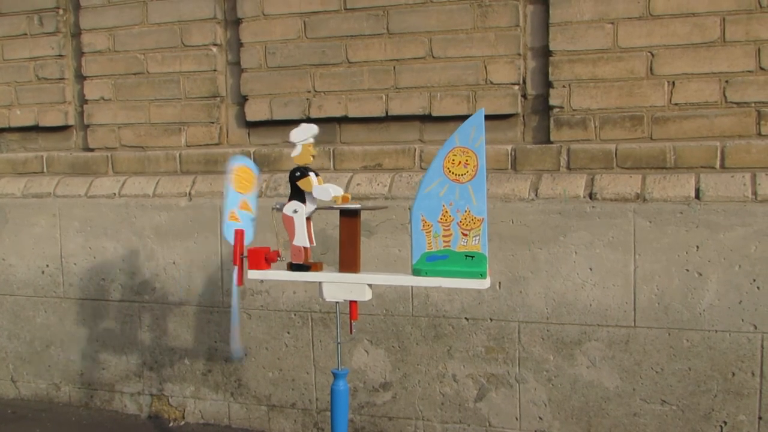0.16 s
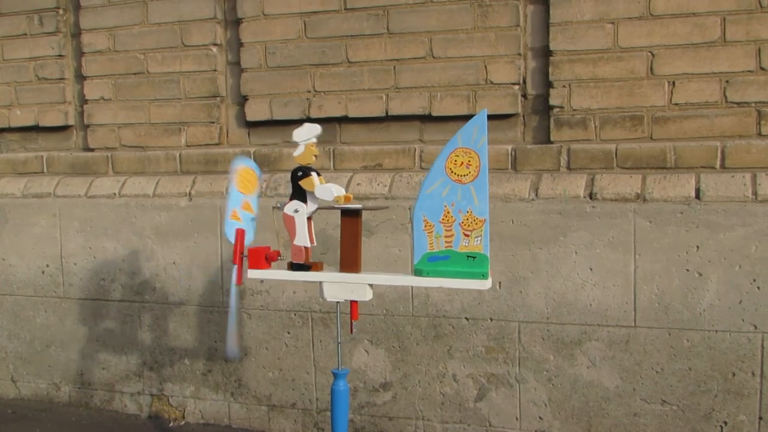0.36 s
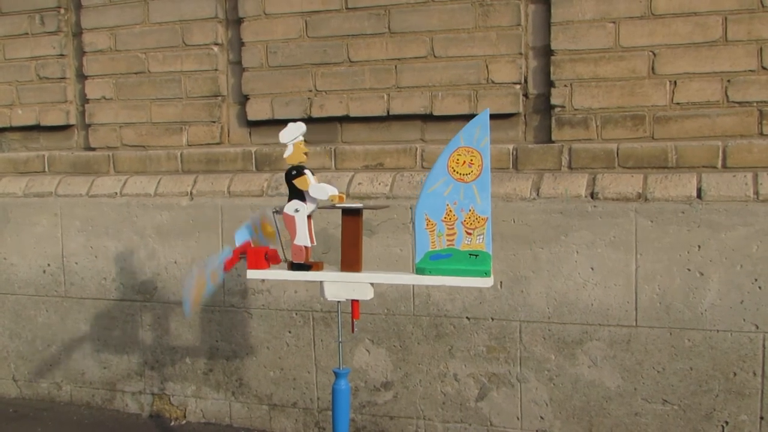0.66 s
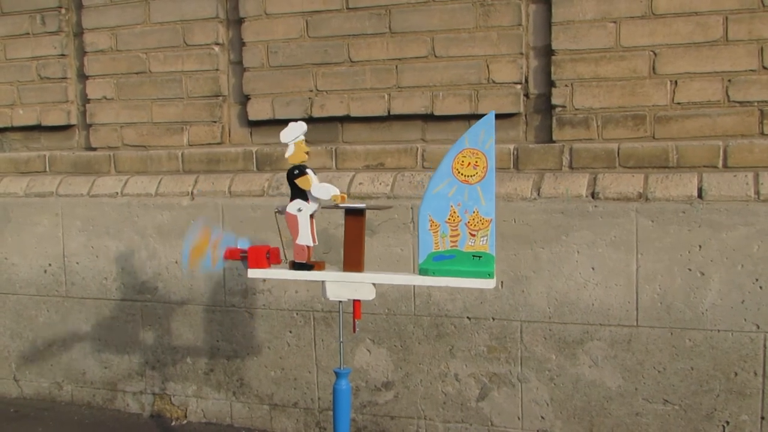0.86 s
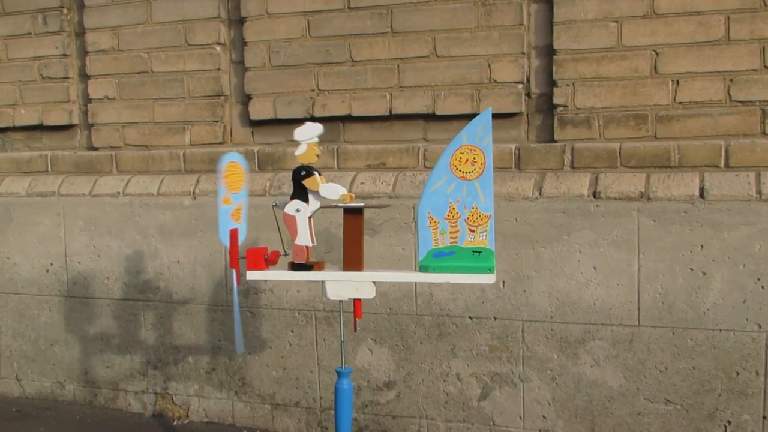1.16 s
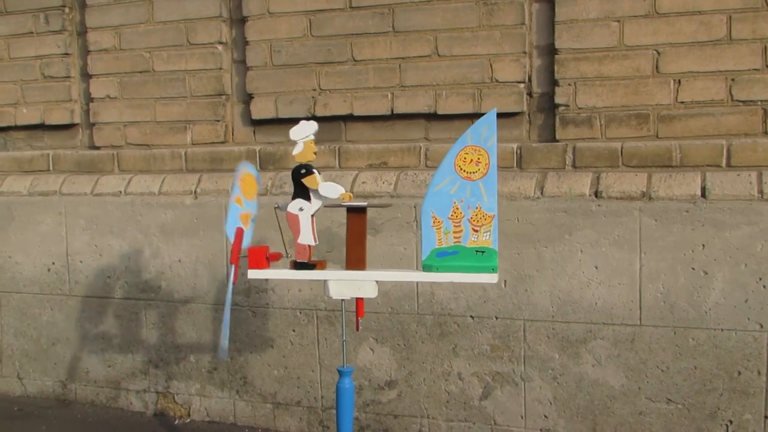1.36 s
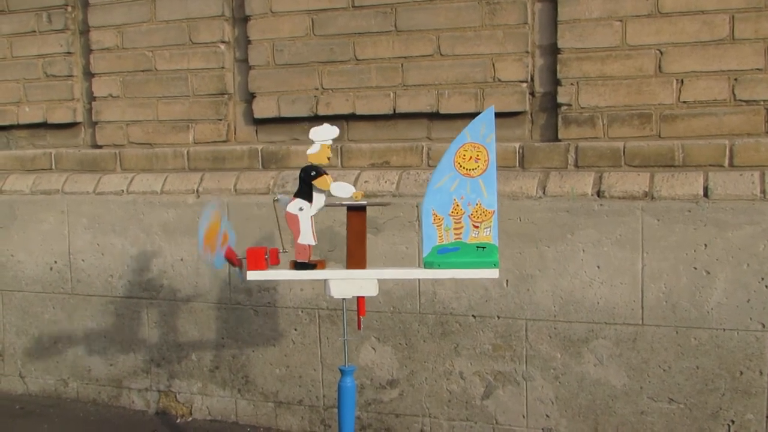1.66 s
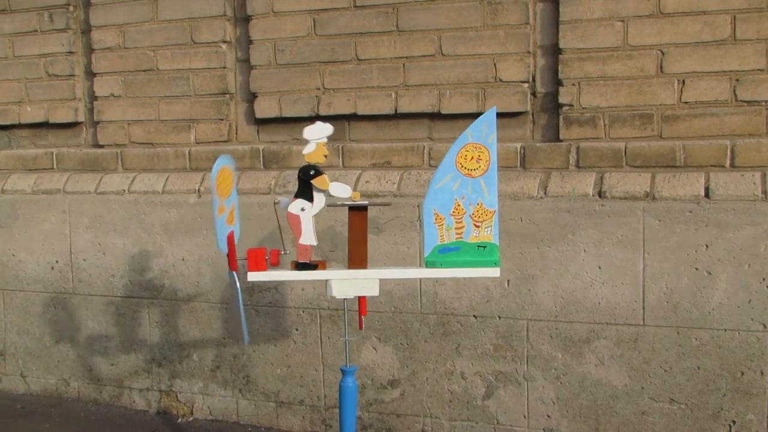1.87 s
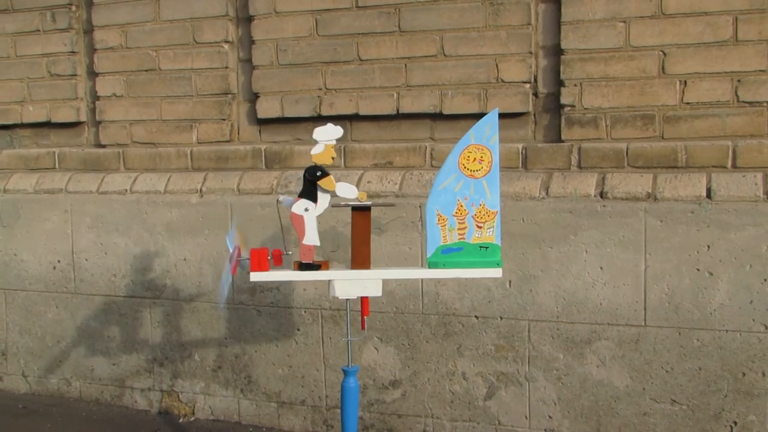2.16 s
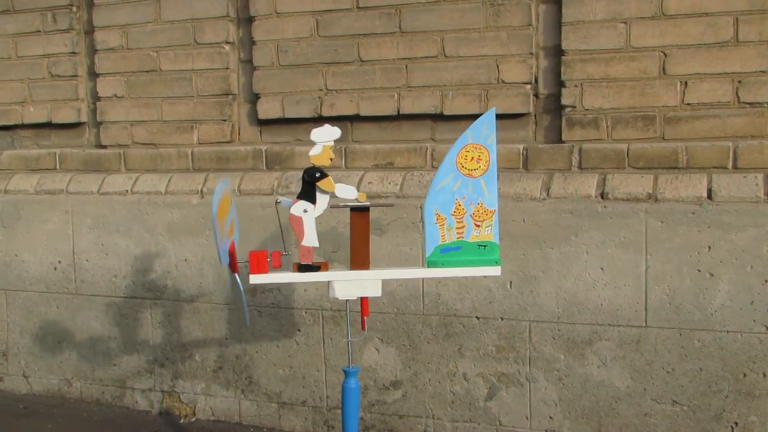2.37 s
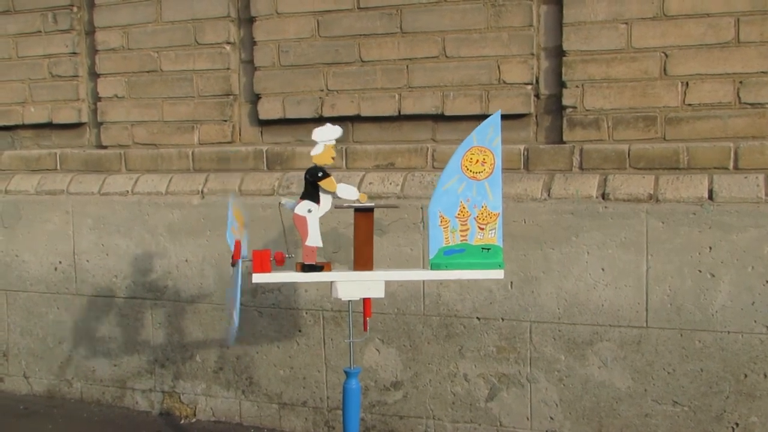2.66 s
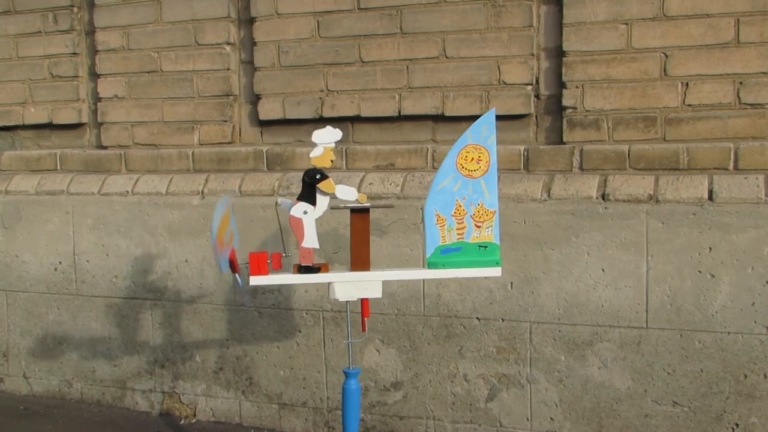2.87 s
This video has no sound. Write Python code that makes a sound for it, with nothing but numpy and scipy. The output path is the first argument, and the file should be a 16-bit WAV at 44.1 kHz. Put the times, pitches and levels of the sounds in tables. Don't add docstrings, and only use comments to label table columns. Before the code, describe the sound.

Heavy wind rumble and flutter on the microphone, nearly covering a toy windmill's faint regular wooden clicking.

```python
import sys
import numpy as np
from scipy import signal
from scipy.fft import rfft, irfft
from scipy.io import wavfile
from scipy.ndimage import uniform_filter1d

SR = 44100
rng = np.random.default_rng(int(sys.argv[2]) if len(sys.argv) > 2 else 0)


def makeup_ratio(level_db):
    decades = np.asarray(level_db, float) / 20
    return 10 ** decades


def wrap_up_sound(samples):
    columns = np.atleast_2d(samples).T
    tamed = np.clip(columns, -1, 1)
    steps = np.round(tamed * 32767).astype(np.int16)
    wavfile.write(sys.argv[1], SR, steps)


N = 133623
T = np.arange(N) / SR

# (frequency [Hz], level [dB per Hz])
STREET_HISS = [(400, -2.5), (1400, 0.5), (3000, -9.5), (3750, -13), (4050, -17), (7700, -21.5), (8100, -25),
               (13500, -27.5)]
# (time [s], speed as level [dB], push [dB])
WIND_COURSE = [(0, -39.5, -4), (.25, -38.5, 0.5), (0.647, -43.5, -4.5), (0.708, -59, 3.5),
               (0.838, -57.5, -0.5), (.99, -55, 1.5), (1.02, -43, 1), (1.199, -49.5, -0.5), (1.52, -52, 3),
               (1.69, -69, 3.5), (1.828, -60.5, 1.5), (1.878, -54.5, 1.5), (2.174, -52.5, 4),
               (2.243, -66.5, 2), (2.417, -48, 2), (2.61, -46.5, 1), (2.647, -61.5, 6), (2.77, -59, -2.5)]
# (time [s], peak [dB], length [s], extra push [dB])
WIND_PUFFS = [(.008, -18, 0.0094, 1.5), (0.176, -28.5, 0.023, -1), (0.32, -47, 0.0037, -2.5),
              (0.473, -66, 0.022, 4.5), (0.548, -36.5, 0.054, 0.5), (0.778, -41.5, 0.0083, -1.5),
              (0.915, -41, 0.024, 3), (1.002, -46, 0.017, 3.5), (1.036, -28.5, 0.013, 0),
              (1.101, -40.5, 0.022, -3), (1.158, -40.5, 0.016, -3), (1.285, -47.5, 0.0062, 6.5),
              (1.318, -45.5, 0.075, 0), (1.45, -40.5, 0.042, -3.5), (1.582, -56.5, 0.082, 0),
              (1.727, -63, 0.047, 6.5), (1.908, -52, 0.018, 4.5), (1.96, -47.5, 0.03, 3.5),
              (2.069, -53.5, 0.011, 5.5), (2.108, -40, 0.032, -1.5), (2.132, -46, 0.023, 2.5),
              (2.302, -45, 0.022, 0.5), (2.794, -37, 0.12, 3.5), (2.896, -45.5, 0.3, 3),
              (3.005, -39, 0.004, -0.5)]
# (frequency [Hz], level [dB per Hz])
EDDY_SPECTRUM = [(15, 4.5), (60, 0), (190, 0.5), (320, -4.5), (520, -12), (1000, -35.5), (2000, -64),
                 (5000, -78)]
# (frequency [Hz], level [dB])
ONE_PORT_SHARE = [(30, -19.5), (100, -12), (250, -12.5), (1000, -12), (3000, -14)]
# (frequency [Hz], level [dB])
LEFT_LEAN = [(60, -0.76), (250, 1.52), (1000, 2), (3000, 4)]
# (time [s], level
# [dB], pitch [Hz], length [cycles], right share [gain])
EDDY_STRIKES = [(.0005, -13.5, 112, 1.1, 1.56), (2.96, -12, 414, 3.7, 0.35), (1.037, -6, 450, 0.97, 0.54),
                (.180, -32, 2120, 2.5, 0.42), (.487, -4.5, 90, 1.8, 0.77), (.572, -6, 90, 1.6, 0.79),
                (.776, -33.5, 890, 1.5, 0.68), (.920, -6.5, 710, 1.9, 0.46), (.938, -20, 910, 1.7, 0.46),
                (1.012, -6, 451, 2.7, 0.59), (1.039, -30, 2430, 0.98, 0.18), (1.064, -27, 1300, 2, 0.41),
                (1.095, -32, 1630, 3, 0.56), (1.289, -27.5, 1440, 3.3, 0.29), (1.912, -19, 65, 1.4, 1.2),
                (2.110, -15.5, 850, 1.8, 0.41), (2.138, -14, 720, 1.9, 0.35), (2.82, -1.5, 78, 1, 0.75),
                (2.848, -3, 214, 1.17, 0.4), (2.92, -8.5, 71.5, 1.4, 0.85)]
# (time [s], peak [dB], pitch [Hz])
EDDY_FLICKS = [(0.066, -23.5, 840), (0.129, -28, 767), (0.172, -28.5, 830), (0.273, -26, 810),
               (0.332, -35.5, 816), (0.344, -25, 821), (0.417, -27, 767), (0.502, -27.5, 899),
               (0.54, -31.5, 826), (1.026, -28.5, 980), (1.069, -38, 791), (1.16, -31, 764),
               (1.211, -31, 850), (1.243, -41, 767), (1.313, -38, 988), (1.33, -34, 751),
               (1.345, -29.5, 765), (1.369, -44, 751), (1.432, -44, 826), (1.473, -26.5, 760),
               (1.846, -41, 820), (1.96, -53, 751), (1.981, -40, 796), (2.307, -45, 820),
               (2.396, -37.5, 790), (2.436, -36, 751), (2.535, -45, 773), (2.8, -35, 775),
               (2.882, -34, 883), (2.901, -24, 829), (2.947, -39, 1180), (2.956, -31, 848),
               (3.014, -37, 867)]
# (time [s], peak [dB], length [s], lower ring [dB])
CRANK_CLACKS = [(0.1014, -53, 0.011, -13), (0.1784, -57, 0.008, -5), (0.3085, -58.5, 0.015, -7),
                (0.3989, -64, 0.0083, -14), (0.53, -62, 0.0083, -32), (0.626, -65, 0.0098, -6),
                (0.7436, -54, 0.013, -10.5), (0.8624, -60.5, 0.011, -4), (0.971, -52, 0.014, -9),
                (1.079, -65, 0.0092, -5), (1.1976, -50.5, 0.011, -15), (1.3103, -56.5, 0.011, -9),
                (1.428, -53.5, 0.0098, -13), (1.523, -66, 0.0096, -9), (1.656, -56, 0.011, -9),
                (1.79, -62.5, 0.0089, -13), (1.8926, -53.5, 0.012, -12.5), (2.0066, -51.5, 0.015, -14),
                (2.129, -57.5, 0.013, -7), (2.246, -63, 0.011, -10), (2.381, -56.5, 0.012, -6),
                (2.4966, -59.5, 0.0094, -1.5), (2.6184, -52.5, 0.017, -8.5), (2.731, -57.5, 0.0071, -13),
                (2.876, -62, 0.011, -6), (2.992, -54.5, 0.0073, -4.5)]
# (time [s], peak [dB], lower ring [dB])
LIGHT_CLACKS = [(0.1344, -65.5, -6), (0.1914, -62, -7), (0.342, -63, -17), (0.4154, -69, 5.5),
                (0.5258, -57, -4), (0.559, -58.5, -12), (0.776, -65, -9), (0.849, -60.5, -6),
                (1.0055, -68, -11), (1.07, -65, -5), (1.23, -59, -8), (1.2599, -68, -7),
                (1.3163, -60, -11), (1.3338, -64, -6), (1.4234, -55, -8), (1.5324, -63, -15),
                (1.544, -70, -7), (1.654, -57, -9), (1.686, -66, -11), (1.718, -60.5, -9),
                (1.7633, -68, -6), (1.7748, -59, -13), (1.9568, -61.5, -8), (2.0305, -57, -12),
                (2.167, -66.5, 1), (2.198, -63, -14), (2.2574, -61.5, -7), (2.364, -62, -6),
                (2.4412, -71, 3), (2.4866, -61, -9), (2.5141, -60, -9), (2.612, -61, -14),
                (2.6544, -73, -5), (2.7234, -61, -13), (2.7544, -59.5, -10), (2.8608, -63, -8),
                (2.975, -59, -4)]
# (frequency [Hz], level [dB], t60 [s])
WOOD_AND_WIRE = [(4390, 2, 0.0067), (4760, -4, 0.012), (7100, -33, 0.0021), (7560, -8, 0.005),
                 (8880, -4.5, 0.0084), (10000, -7, 0.0028), (11100, -6.5, 0.009), (12470, -2, 0.0033),
                 (13700, -7, .005)]
# (time [s], level [dB], pitch [Hz], length [s])
AXLE_SQUEAKS = [
    (0.186, -60, 3500, 0.025),
    (0.395, -55, 3460, 0.012),
]
# (frequency [Hz], width [Hz], depth [0-1])
NARROW_GAPS = [(3915, 260, 0.9), (8030, 230, 0.8)]


def unit_power(x):
    return x / np.sqrt(np.mean(x ** 2) + 1e-20)


def at_hz(points, hz):
    point_hz, level_db = np.transpose(points)
    return np.interp(np.log(hz), np.log(point_hz), level_db)


def drift(hz):
    r = np.exp(-40 * np.pi * hz / SR)
    slow = signal.lfilter([1], [1, -2 * r, r * r], rng.standard_normal(N // 20 + 2002))[2000:]
    return np.interp(np.arange(N) / 20, np.arange(len(slow)), unit_power(slow))


def band(x, low_hz, high_hz, order):
    return signal.sosfilt(signal.butter(order, [low_hz, high_hz], "band", fs=SR, output="sos"), x)


def settled(sos, x):
    lead_in = 2 * x[:, :1] - x[:, 999:0:-1]
    return signal.sosfilt(sos, np.concatenate([lead_in, x], axis=1))[:, 999:]


def swell(s, length_s):
    u = np.clip((T - s) / max(length_s, 1e-3) * 3, 0, 40)
    return u * np.exp(1 - u)


def street():
    level_db, early_db, top_hz, alike = -62.5, 3.5, 13700, 0.59
    hz = np.arange(N // 2 + 1) * SR / N + 1
    shape = makeup_ratio(at_hz(STREET_HISS, hz)) / (1 + (hz / top_hz) ** 20)
    mid, side = irfft(rfft(rng.standard_normal((2, N))) * shape, N)
    both = np.sqrt(1 + alike) * mid + np.sqrt(1 - alike) * side * [[1], [-1]]
    fade_db = early_db * np.exp(-(T / 0.56) ** 2)
    return makeup_ratio(level_db + fade_db + 0.55 * drift(24)) * unit_power(both)


def flicker(gust_db):
    lull_db, top_db = -21, 7.5
    flick_db = 5 * drift(83)
    flick_db = flick_db + 3 * (drift(149) ** 2 - 1)
    flick_db = flick_db - uniform_filter1d(flick_db, size=1000)
    flick_db = flick_db / (1 + makeup_ratio(lull_db - gust_db))
    return top_db * np.tanh(flick_db / top_db)


def wind():
    level_db, puff_db, top_speed_db = -17, -1.5, 19
    octaves_per_db, loud_follows, lump_db = 0.067, 0.079, 1.75
    right_cut_hz, low_cut_hz, port_cut_hz = 1615, 44, 14000

    s, speed_db, push_db = np.transpose(WIND_COURSE)
    power = makeup_ratio(2 * np.interp(T, s, speed_db))
    push = np.interp(T, s, push_db)
    for t, peak_db, length_s, extra_db in WIND_PUFFS:
        power = power + makeup_ratio(2 * (peak_db + puff_db)) * swell(t - .004, length_s) ** 2
        push = push + extra_db * swell(t - .004, 1.54 * length_s)
    gust_db = 10 * np.log10(power) + 48
    push = push + loud_follows * gust_db + lump_db * drift(25)

    rush_db = -10 * np.log10(makeup_ratio(-2 * (gust_db + flicker(gust_db))) + makeup_ratio(-2 * top_speed_db))
    smooth_db = uniform_filter1d(uniform_filter1d(rush_db, size=40), size=40)
    speed = 2 ** (octaves_per_db * smooth_db)

    run_in = 8192
    white = rng.standard_normal((2, 3, N + run_in))
    edges = 14 * 2 ** np.arange(0, 8.6, .5)
    both, own = 0, 0
    for k, (low, high) in enumerate(zip(edges, edges[1:])):
        hz = np.sqrt(low * high)
        noise = band(white[k % 2], low, high, order=3)[:, run_in:]
        lean_db = at_hz(LEFT_LEAN, hz) * np.array([[.5], [-.5]])
        gain = makeup_ratio(at_hz(EDDY_SPECTRUM, hz / speed) + push + lean_db)
        both = both + gain * noise[0]
        own = own + gain * makeup_ratio(at_hz(ONE_PORT_SHARE, hz)) * noise[1:]
    right = -settled(signal.butter(1, right_cut_hz, fs=SR, output="sos"), both)[1]
    ports = makeup_ratio(level_db) * unit_power(np.array([both[0], right]) + own)
    ports = settled(signal.butter(3, [5, port_cut_hz], "band", fs=SR, output="sos"), ports)
    return settled(signal.butter(2, low_cut_hz, "high", fs=SR, output="sos"), ports)


def strikes():
    late_s, flick_db, flick_cycles, flick_share = 0.002975, 10, 1.32, 0.42
    flicks = [(s + late_s, db + flick_db, hz, flick_cycles, flick_share) for s, db, hz in EDDY_FLICKS]
    out = np.zeros((2, N))
    for s, db, hz, cycles, share in list(EDDY_STRIKES) + flicks:
        u = (T - s) * hz
        bell = 1 / np.cosh(np.clip(4.0 * u / cycles, -60, 60))
        out += makeup_ratio(db) * np.cos(2 * np.pi * u) * bell * np.array([[1], [-share]])
    return out


def contact(s, length_s):
    tail_db, tail_s = -14, 0.02
    u = (T - s) / max(length_s, 1e-3)
    hold = np.exp(-.7 * np.clip(u, 0, 9)) / (1 + np.exp(np.clip(7 * (u - 1), -30, 30)))
    rattle = makeup_ratio(tail_db) * np.exp(-np.abs(T - s) / tail_s)
    return np.clip(u * 5, 0, 1) * (hold + rattle)


def ring(shapes, colour, low_db):
    ring_db, slips_per_s = -15.5, 2200
    out = np.zeros(N)
    for k, (hz, db, t60) in enumerate(WOOD_AND_WIRE):
        slips = (rng.random(N) < slips_per_s / SR) * rng.standard_normal(N)
        force = makeup_ratio(db + ring_db + colour[:, k] + low_db * (k < 4)) @ shapes * slips
        r, w = makeup_ratio(-60 / (t60 * SR)), 2 * np.pi * hz / SR
        out += signal.lfilter([0, np.sin(w)], [1, -2 * r * np.cos(w), r * r], force + 1e-18)
    return out


def crack(shapes, colour, low_db):
    crack_db, side_db, grain_db, grain_hz = -4.5, -5.5, 5, 300
    out = np.zeros((2, N))
    for k, (low_hz, high_hz) in enumerate([(2500, 4070), (5600, 7200), (8000, 9900), (11000, 13000)]):
        mid, side = band(rng.standard_normal((2, N)), low_hz, high_hz, order=2)
        burst = makeup_ratio(crack_db + colour[:, -1 - k] + low_db * (k < 2)) @ shapes
        burst = burst * makeup_ratio(grain_db * drift(grain_hz))
        out += burst * (mid + makeup_ratio(side_db) * side * [[1], [-1]])
    return out


def squeaks():
    out = np.zeros(N)
    for s, db, hz, length_s in AXLE_SQUEAKS:
        noise = band(rng.standard_normal(N), hz * 0.91, hz * 0.996, order=1)
        out += makeup_ratio(db) * swell(s, length_s) * unit_power(noise)
    return out


def whirligig():
    touch_s, clack_db, low_wood_db = 0.0077, -3, 9
    wall_s, wall_db = .006, -11
    hits = list(CRANK_CLACKS) + [(s, db, touch_s, low) for s, db, low in LIGHT_CLACKS]
    shapes = np.array([makeup_ratio(db + clack_db) * contact(s - .001, d) for s, db, d, _ in hits])
    low_db = np.array(hits)[:, 3] + low_wood_db
    colour = rng.normal(0, 4, (len(hits), len(WOOD_AND_WIRE) + 4))
    toy = ring(shapes, colour, low_db) + crack(shapes, colour, low_db) + squeaks()
    lags = (wall_s * SR * np.array([1.0, 1.13])).astype(int)
    return np.array([side + makeup_ratio(wall_db) * np.roll(side, lag) for side, lag in zip(toy, lags)])


def scene():
    return street() + wind() + strikes() + whirligig()


def low_pass(x):
    return signal.sosfilt(signal.butter(12, 15000, fs=SR, output="sos"), x)


def record(dry):
    fade_s = .004
    x = 1.516 * np.tanh(dry / 1.4)
    for hz, width_hz, depth in NARROW_GAPS:
        peak = signal.tf2sos(*signal.iirpeak(hz, hz / width_hz, fs=SR))
        x = x - depth * settled(peak, x)
    x = settled(signal.butter(12, 14600, fs=SR, output="sos"), x)
    x = x * np.clip((T[-1] - T) / fade_s, 0, 1)
    return low_pass(x)


dry = scene()
out = record(dry)
wrap_up_sound(out)
```